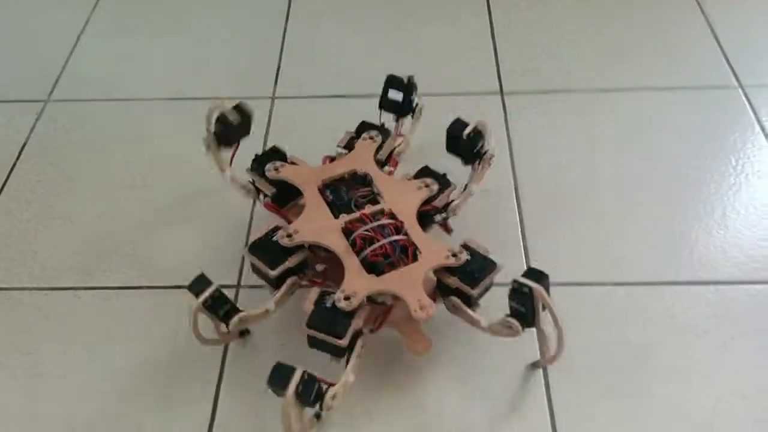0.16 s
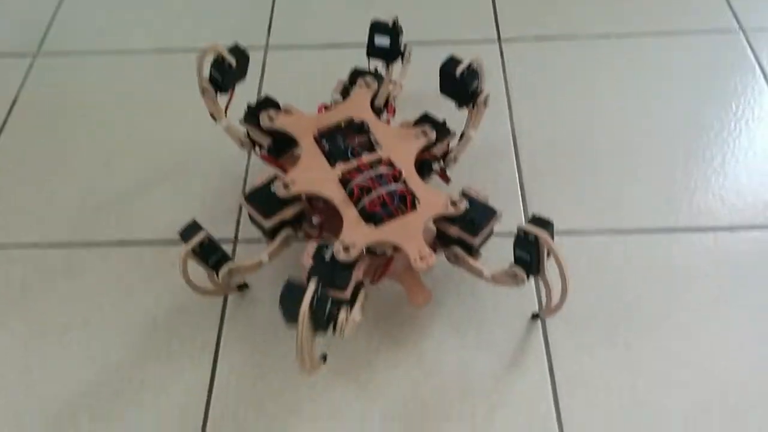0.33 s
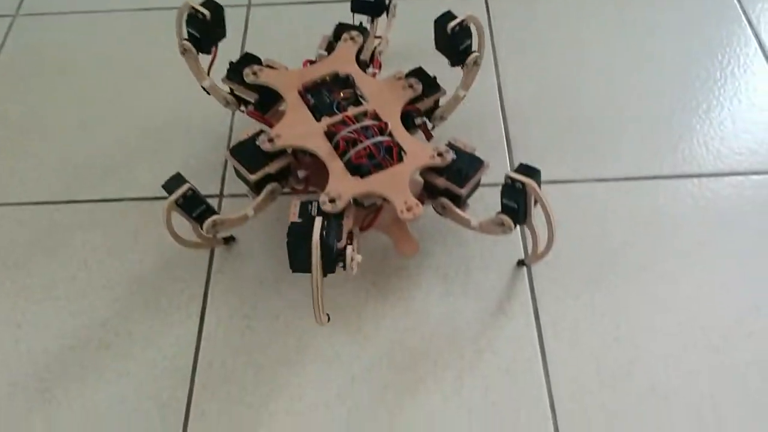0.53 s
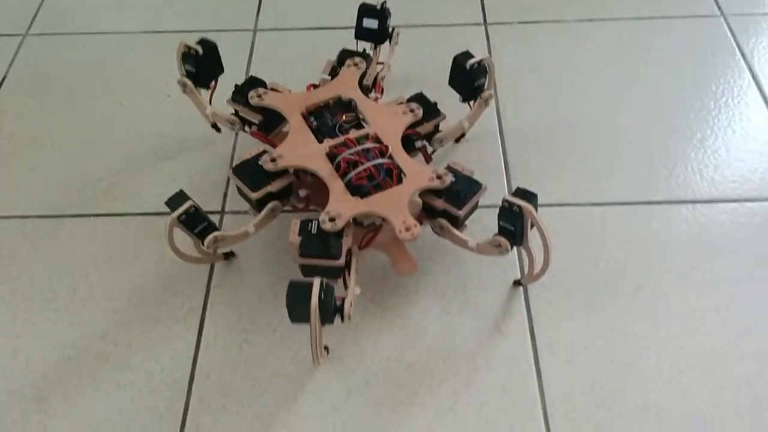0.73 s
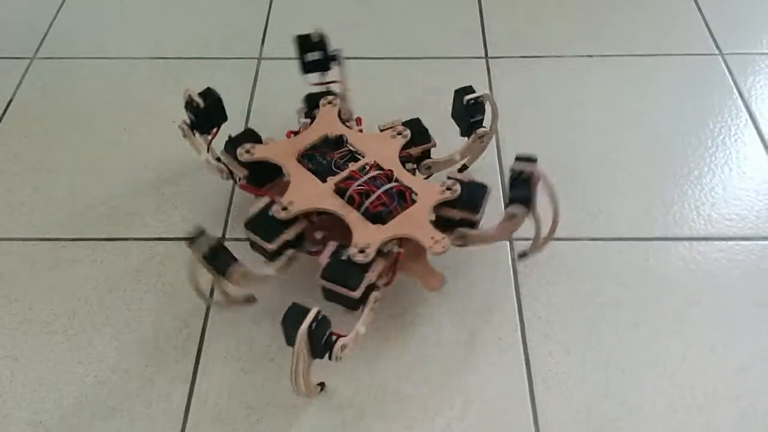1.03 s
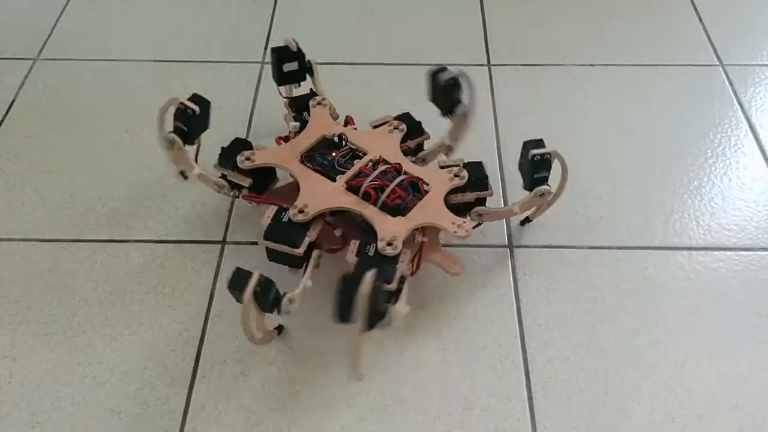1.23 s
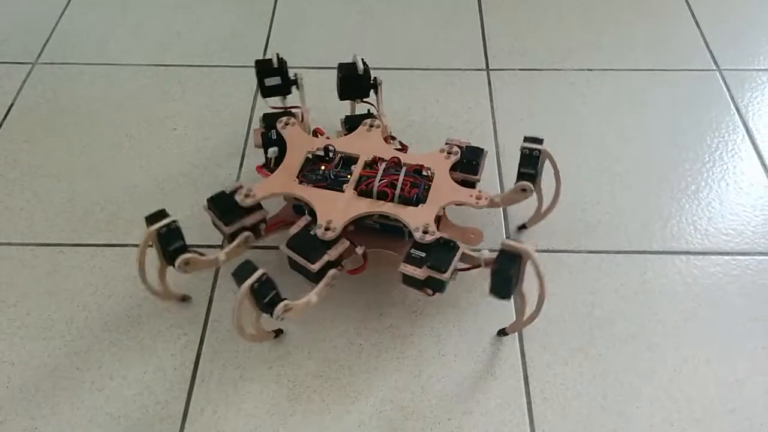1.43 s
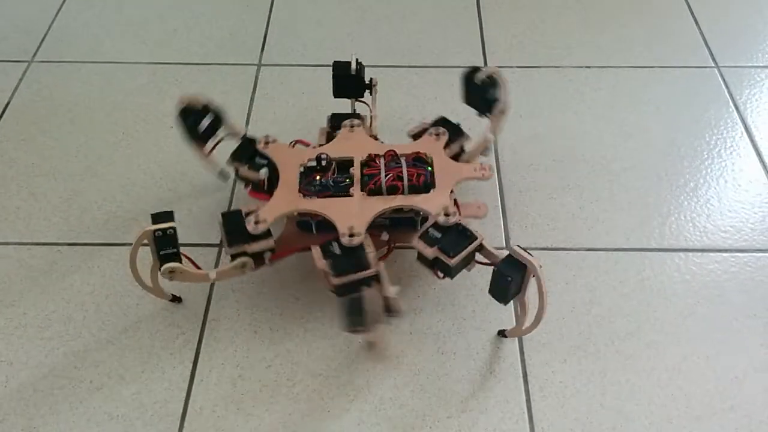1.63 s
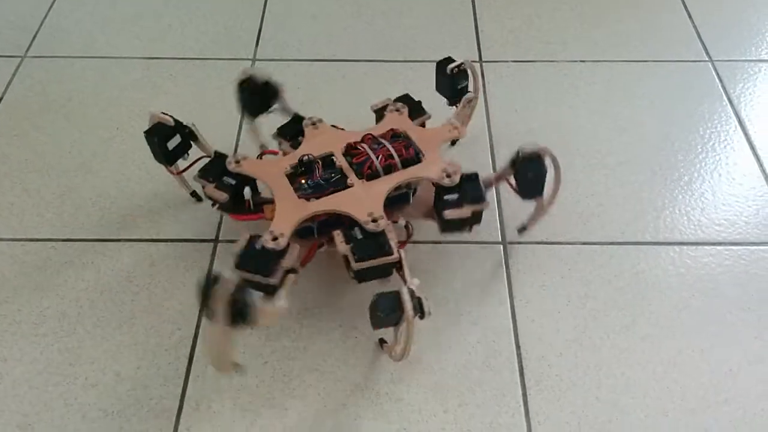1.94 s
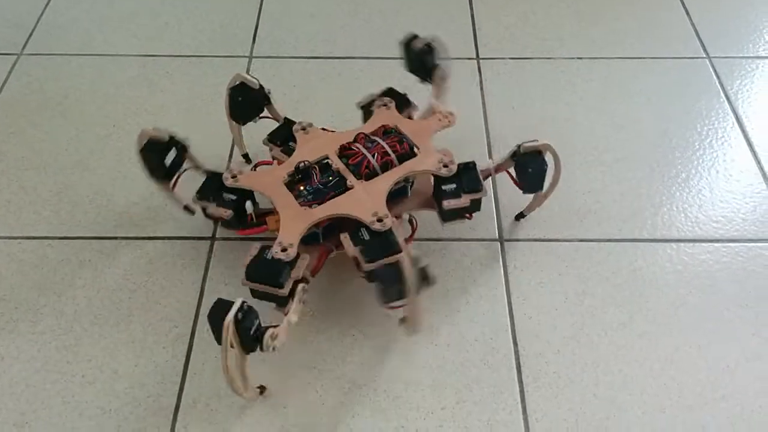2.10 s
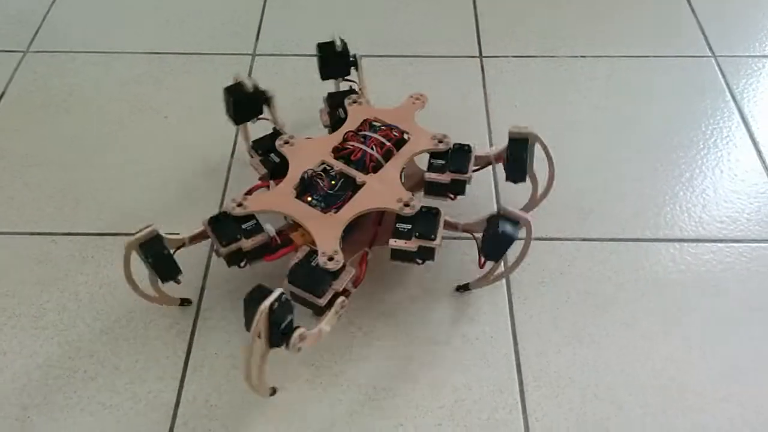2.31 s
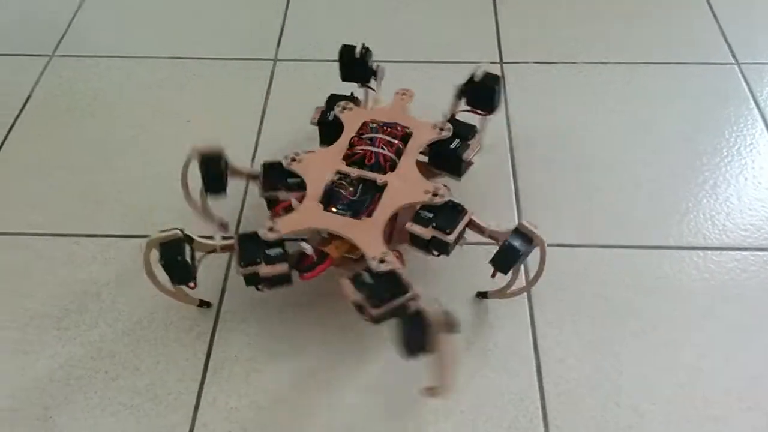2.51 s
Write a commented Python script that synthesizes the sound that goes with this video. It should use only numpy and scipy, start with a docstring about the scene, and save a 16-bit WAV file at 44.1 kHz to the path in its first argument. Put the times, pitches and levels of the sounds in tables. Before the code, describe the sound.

Raspy servo gear whirring in bursts from a small walking robot, with light clacks of feet on tile

```python
"""Six-legged robot turning on tiles

Eight servo gear trains grind as uneven teeth click and rub; rough gliding tones whine above them.
Early on it stands still twice: random kicks rattle the loaded servo cases and a rough tone buzzes.
Then it walks on. Feet tap and skid as bursts of clicks ringing leg and frame modes; frame modes
also ring as the body settles. A hard room adds a noise tail, over quiet shaped-noise air."""
import sys
import numpy as np
from scipy import signal
from scipy.fft import rfft, irfft
from scipy.io import wavfile
from scipy.ndimage import uniform_filter1d

SR = 44100
rng = np.random.default_rng(int(sys.argv[2]) if len(sys.argv) > 2 else 0)


def log_audio(samples):
    """Write samples as a 16-bit WAV file to the path given in sys.argv[1]."""
    # one column per channel
    frames = np.atleast_2d(samples).T
    # limit to full scale, then quantise
    limited = np.clip(frames, -1, 1)
    pcm = np.round(limited * 32767).astype(np.int16)
    wavfile.write(sys.argv[1], SR, pcm)


N = 117306
T = np.arange(N) / SR


def from_db(db):
    """Decibels to gain."""
    return 10 ** (np.asarray(db) / 20)


def rms_one(x):
    """Scale to unit rms."""
    return x / np.sqrt(np.mean(x ** 2) + 1e-20)


def drift(rate_hz):
    """Slow random signal of unit rms: noise through a double one-pole low-pass."""
    r = np.exp(-2 * np.pi * rate_hz / SR)
    noise = rng.standard_normal(2 * N)
    return rms_one(signal.lfilter([1], [1, -2 * r, r * r], noise)[N:])


def spread_gain(spread_db):
    """Random gain per sample, clipped at two deviations."""
    return from_db(spread_db * np.clip(rng.standard_normal(N), -2, 2))


def tone(hz):
    """Sine that follows a frequency track."""
    return np.sin(2 * np.pi * np.cumsum(hz) / SR)


def colour(x, points):
    """Filter a steady sound by a (f/Hz, level/dB) curve, interpolated over log frequency."""
    hz, db = np.transpose(points)
    bins_hz = np.maximum(np.fft.rfftfreq(2 * N, 1 / SR), 1)
    gain = from_db(np.interp(np.log(bins_hz), np.log(hz), db))
    return irfft(rfft(x, 2 * N) * gain)[:N]


def band(x, low_hz, high_hz):
    """Steep band-pass, output at unit rms."""
    hz = np.maximum(np.fft.rfftfreq(N, 1 / SR), 1)
    gain = ((1 + (low_hz / hz) ** 24) * (1 + (hz / high_hz) ** 24)) ** -.5
    return rms_one(irfft(rfft(x) * gain, N))


def resonate(x, hz, width_hz):
    """Two-pole resonance, unit gain at its top."""
    r = np.exp(-np.pi * width_hz / SR)
    zeros = np.array([1, 0, -1]) * (1 - r * r) / 2
    poles = [1, -2 * r * np.cos(2 * np.pi * hz / SR), r * r]
    return signal.lfilter(zeros, poles, x)


def ring(clicks, modes):
    """Clicks excite decaying sine modes of alternating sign."""
    out = 0
    for k, (hz, db, t60_s) in enumerate(modes):
        r = np.exp(-np.log(1000) / (t60_s * SR))
        w = 2 * np.pi * hz / SR
        poles = [1, -2 * r * np.cos(w), r * r]
        mode = signal.lfilter([0, np.sin(w)], poles, clicks + 1e-18)  # offset avoids denormals
        out = out + (-1) ** k * from_db(db) * mode
    return out


# Gear train effort before trim: t/s, rasp level/dB, low grind level/dB, treble level/dB
GEAR_EFFORT = [(0.0, -27, -30, -37), (0.08, -28, -38, -38), (0.1, -26, -30, -36.5), (0.12, -30, -33.5, -38),
               (0.27, -27, -32, -35.5), (0.32, -30.5, -38.5, -41.5), (0.51, -29, -38, -43),
               (0.6, -43, -47.5, -53), (0.63, -29.5, -44.5, -43.5), (0.75, -29, -40, -39),
               (0.9, -28, -39, -41.5), (0.93, -40, -46, -48), (0.95, -34, -41, -47),
               (0.99, -26, -35.5, -35.5), (1.05, -26.5, -31.5, -37.5), (1.17, -26, -31, -32.5),
               (1.21, -26, -26, -33.5), (1.23, -21.5, -36, -33), (1.24, -25, -29, -37.5),
               (1.31, -27.5, -34, -34.5), (1.35, -23, -28, -31), (1.38, -26, -29, -33.5),
               (1.52, -23.5, -30, -30.5), (1.55, -23.5, -29.5, -35.5), (1.61, -27, -36, -37.5),
               (1.64, -26, -32.5, -33.5), (1.74, -28, -30.5, -33), (1.78, -21, -32.5, -29.5),
               (1.83, -24.5, -30, -37), (1.87, -29.5, -37, -39.5), (1.9, -25.5, -30, -34.5),
               (1.98, -24, -30, -32.5), (2.0, -29.5, -31, -37), (2.07, -23, -31, -29.5),
               (2.12, -25, -30.5, -36.5), (2.15, -28.5, -40, -42), (2.16, -27, -32.5, -37),
               (2.35, -23.5, -31.5, -29), (2.39, -24, -28.5, -37), (2.43, -28, -37.5, -40),
               (2.48, -24.5, -28.5, -32), (2.52, -25.5, -34, -36.5), (2.55, -24, -31, -33.5),
               (2.57, -27, -32.5, -34), (2.61, -24.5, -32.5, -29.5), (2.66, -23, -29.5, -33)]
RASP_TRIM_DB, GRIND_TRIM_DB, TREBLE_TRIM_DB = -1.5, -0.9, 0
LOW_SPLIT_HZ, HIGH_SPLIT_HZ = 3987, 8090
FLICKER_DB = 0.86  # rms, independent per range
# Standing still under load: start t/s, end t/s, chatter + buzz power share/1, case pitch ratio/1
STANDING_HOLDS = [(.31, 0.567, 0.55, .99), (0.613, 0.917, 0.84, 1.015)]
BASE_CHATTER_SHARE, HOLD_FADE_S = 0.07, 0.013


def servos():
    """Gear noise in three ranges tracks effort; chatter and buzz gain share while standing."""
    share = BASE_CHATTER_SHARE
    sound = np.sqrt(1 - share) * rms_one(gears(count=8)) + np.sqrt(share) * chatter(0.98)
    for start, end, held, pitch in STANDING_HOLDS:
        fade = np.clip(np.minimum(T - start, end - T) / HOLD_FADE_S, 0, 1)
        share = held * fade
        loaded = rms_one(chatter(pitch) + buzz(pitch))
        sound = np.sqrt(1 - share) * sound + np.sqrt(share) * loaded
    s, *levels = np.transpose(GEAR_EFFORT)
    trims = (RASP_TRIM_DB, GRIND_TRIM_DB, TREBLE_TRIM_DB)
    ranges = [(LOW_SPLIT_HZ, HIGH_SPLIT_HZ), (100, LOW_SPLIT_HZ), (HIGH_SPLIT_HZ, SR / 2)]
    out = 0
    for level, trim_db, (low_hz, high_hz) in zip(levels, trims, ranges):
        part = band(sound, low_hz, high_hz)
        even = part / np.sqrt(uniform_filter1d(part ** 2, size=1400))  # levelled over 32 ms
        level_db = trim_db + np.interp(T, s, level) + FLICKER_DB * drift(30)
        out = out + from_db(level_db) * even
    return out


# Gearbox colour: f/Hz, relative level/dB
GEARBOX_COLOUR = [(300, -34), (750, -27), (1250, -28.5), (1620, -13.5), (1900, -13), (2600, -3.5),
                  (3300, -1.5), (3750, -5), (4450, 2), (5100, 2), (6300, -1), (8500, -11), (10000, -13.5),
                  (12500, -15), (15800, -21)]
MESH_CENTRE_HZ, SPEED_SWING_OCT, STROKE_S = 1300.5, .22, .283  # servos are spread around the centre
TOOTH_JITTER, TOOTH_SPREAD_DB = .024, 2.1  # jitter: rms fraction of mesh rate
FRICTION_DB, WOBBLE_DB = -3.5, 2.5  # friction relative to clicks; wobble rms
GEAR_RING_TAU_S, GEAR_RING_DB = 0.0022, -2


def gears(count):
    """Servo speed swings each stroke; uneven teeth click and rub, and each gearbox rings."""
    out, t = 0, T[:SR // 40]
    for k in range(count):
        swing = np.sin(2 * np.pi * (T / STROKE_S + rng.random()))
        octaves = k / count - .5 + SPEED_SWING_OCT * swing
        mesh_hz = MESH_CENTRE_HZ * 2 ** octaves * (1 + TOOTH_JITTER * drift(200))
        teeth = np.cumsum(mesh_hz) / SR
        new_tooth = np.diff(np.floor(teeth), prepend=0) > 0
        clicks = new_tooth * spread_gain(TOOTH_SPREAD_DB)
        rub = rng.standard_normal(N) * (1 - teeth % 1)  # fades across each tooth
        contact = rms_one(clicks - clicks.mean()) + from_db(FRICTION_DB) * rms_one(rub)
        box = rng.standard_normal(len(t)) * np.exp(-t / GEAR_RING_TAU_S)
        box /= np.linalg.norm(box)
        ringing = from_db(GEAR_RING_DB) * signal.fftconvolve(contact, box)[:N]
        out = out + (contact + ringing) * from_db(WOBBLE_DB * drift(59))
    return colour(out, GEARBOX_COLOUR)


# Servo case resonances: f/Hz at pitch ratio 1, width/Hz (doubled per pass), relative level/dB
CASE_MODES = [(1605, 284, -15.5), (2330, 194, -12), (3130, 460, -11), (4500, 230, -1.5), (5500, 130, -3),
              (6110, 240, -4), (6260, 180, -13), (6920, 180, -10), (8600, 100, -20), (9350, 540, -18),
              (11360, 330, -20), (14500, 1200, -30)]
KICKS_PER_S, KICK_SPREAD_DB, KICK_ENERGY_TAU_S = 1100, 1, 0.0025


def chatter(pitch):
    """Small corrective kicks rattle gears across their play and ring the cases."""
    kicks = (rng.random(N) < KICKS_PER_S / SR) * spread_gain(KICK_SPREAD_DB)
    energy = signal.lfilter([1], [1, -np.exp(-1 / (KICK_ENERGY_TAU_S * SR))], kicks ** 2)
    rattle = np.sqrt(energy) * rng.standard_normal(N)
    out = 0
    for hz, width_hz, db in CASE_MODES:
        once = resonate(rattle, hz * pitch, 2 * width_hz)
        out = out + from_db(db) * resonate(once, hz * pitch, 2 * width_hz)
    return rms_one(out)


BUZZ_BASE_HZ, BUZZ_DB = 4500, -7.5  # at pitch ratio 1; relative to chatter
BUZZ_ROUGH, BUZZ_FLUTTER_DB = .022, 13  # rms fraction of frequency; flutter limit, each way


def buzz(pitch):
    """The loaded motor's pinion buzzes on one rough, fluttering tone."""
    hz = BUZZ_BASE_HZ * pitch * (1 + BUZZ_ROUGH * drift(301.5))
    flutter = from_db(BUZZ_FLUTTER_DB * np.tanh(drift(90)))
    return from_db(BUZZ_DB) * rms_one(flutter * tone(hz))


# Motor whines: start t/s, length/s, first f/Hz, last f/Hz, level/dB before trim
MOTOR_WHINES = [(.08, .05, 3200, 2850, -32), (.95, 0.094, 2554, 2910, -34), (1.17, .09, 4100, 4900, -25.5),
                (1.39, 0.046, 4600, 4700, -21.5), (1.544, 0.034, 5500, 5600, -23),
                (1.609, .085, 3040, 3550, -24.5), (1.63, .08, 3850, 4450, -23),
                (1.708, 0.113, 4500, 4445, -23.5), (1.896, 0.12, 4650, 4500, -23),
                (1.93, 0.047, 1900, 2140, -35.5), (1.942, 0.062, 8450, 8600, -30),
                (2.09, .1, 3510, 3090, -27.5), (2.21, .13, 4540, 4350, -25.5),
                (2.495, 0.071, 4400, 4500, -21), (2.511, 0.062, 2100, 2300, -34)]
WHINE_ROUGH, WHINE_FLUTTER_DB, WHINE_TRIM_DB = .04, 6.5, -3  # rms fraction; limit each way


def whines():
    """A rough gear tone glides and flutters as one leg swings."""
    out = 0
    for start, length, first_hz, last_hz, db in MOTOR_WHINES:
        along = np.clip((T - start) / length, 0, 1)
        glide_hz = first_hz + (last_hz - first_hz) * along
        hz = glide_hz * (1 + WHINE_ROUGH * drift(399))
        swell = np.sqrt(np.abs(np.sin(np.pi * along)))
        level_db = WHINE_TRIM_DB + db + WHINE_FLUTTER_DB * np.tanh(drift(200))
        out = out + from_db(level_db) * swell * tone(hz)
    return out


# Footfalls: t/s, clack level/dB before trim, frame thud level/dB before trim, skid length/s
FOOTFALLS = [(.002, -35.5, -31.5, .02), (.056, -28, -51, .018), (.104, -35, -42, .01),
             (0.218, -29.5, -42, .006), (0.261, -33, -29, .025), (0.29, -54, -37, .04),
             (.931, -46, -40, .01), (1.213, -31, -35, .008), (1.267, -28, -32.5, .014),
             (1.521, -31.5, -34, .012), (1.538, -30, -30, .02), (1.578, -34.5, -33, .02),
             (1.776, -27.5, -37, .005), (1.817, -31, -29, .02), (2.081, -37, -33, .025),
             (2.111, -38, -35, .02), (2.14, -39, -37, .01), (2.329, -33.5, -39, .012),
             (2.378, -33, -32, .028), (2.634, -35.5, -36.5, .03)]
# Leg modes: f/Hz, relative level/dB, t60/s
LEG_MODES = [(744, -11.5, 0.023), (858, -3.5, 0.013), (1055, -3.5, 0.028), (1217, -3, 0.027),
             (1583, 1.5, 0.017), (1770, -5.5, .022), (2280, -3, .016)]
# Frame modes: f/Hz, relative level/dB, t60/s
FRAME_MODES = [(66.6, -18, .1), (85, -13.5, 0.11), (123.5, -10, 0.069), (205, -7.5, 0.023),
               (307, -7, 0.026), (433, 0, 0.015), (534, -4, 0.038), (632, -11.5, 0.066)]
CLACK_TRIM_DB, THUD_TRIM_DB = -3.5, -5
SLIPS_PER_S, SLIP_DB = 500, -7  # rms, relative to landing click


def feet():
    """A landing click and a skid of smaller random clicks ring leg and frame."""
    leg, frame = np.zeros(N), np.zeros(N)
    for s, clack_db, thud_db, skid_s in FOOTFALLS:
        slips = (rng.random(N) < SLIPS_PER_S / SR) * (T > s) * (T < s + skid_s)
        clicks = slips * from_db(SLIP_DB) * rng.standard_normal(N)
        clicks[int(s * SR)] = 1
        leg += from_db(clack_db) * clicks
        frame += from_db(thud_db) * clicks
    clack = from_db(CLACK_TRIM_DB) * ring(leg, LEG_MODES)
    thud = from_db(THUD_TRIM_DB) * ring(frame, FRAME_MODES)
    return clack + thud


# Body settling on its legs: t/s, f/Hz, level/dB, t60/s
BODY_SETTLES = [(.107, 205, -43, 0.12), (.29, 99, -39, 0.23), (0.293, 352, -53, 1.0),
                (1.819, 111.6, -41, 0.11)]


def settling():
    """Weight drops onto the legs; one frame mode per event dies away."""
    out = 0
    for s, hz, db, t60_s in BODY_SETTLES:
        drop = np.arange(N) == int(s * SR)
        out = out + ring(drop, [(hz, db, t60_s)])
    return out


ROOM_T60_S, MOTOR_ROOM_DB, STEP_ROOM_DB = 0.47, -11, -1.5  # tail levels relative to direct


def room(x, wet_db):
    """Direct sound plus the diffuse tail of hard walls, as decaying noise."""
    t = T[:SR // 2]
    decay = np.exp(-np.log(1000) * t / ROOM_T60_S)
    tail = rng.standard_normal(len(t)) * decay * (t > .005)
    tail /= np.linalg.norm(tail)
    return x + from_db(wet_db) * signal.fftconvolve(x, tail)[:N]


# Still air spectrum: f/Hz, relative density level/dB
AIR_COLOUR = [(22, -27), (45, -3.5), (70, 3.5), (110, -1), (160, -2), (300, -7.5), (700, -9.5), (1500, -6),
              (5000, -22), (16000, -39)]
AIR_RMS_DB = -52


def air():
    """Steady shaped noise for the still air of the room."""
    return from_db(AIR_RMS_DB) * rms_one(colour(rng.standard_normal(N), AIR_COLOUR))


def scene():
    """Robot straight ahead, alike in both ears."""
    motors = room(servos() + whines(), wet_db=MOTOR_ROOM_DB)
    steps = room(feet(), wet_db=STEP_ROOM_DB)
    mid = motors + steps + settling() + air()
    return np.array([mid, mid])


CUTOFF_HZ = 15800


def record(dry):
    """Steep elliptic low-pass cuts the top."""
    low_pass = signal.ellip(12, .1, 80, CUTOFF_HZ, fs=SR, output="sos")
    return signal.sosfilt(low_pass, dry)


dry = scene()
out = record(dry)
log_audio(out)
```